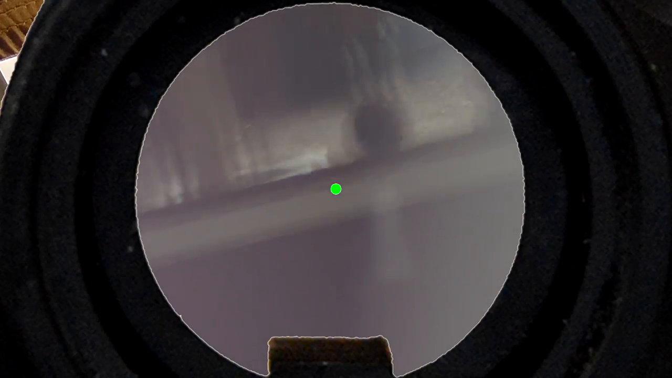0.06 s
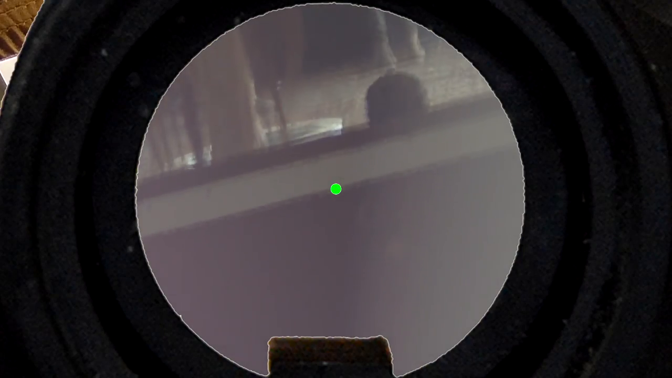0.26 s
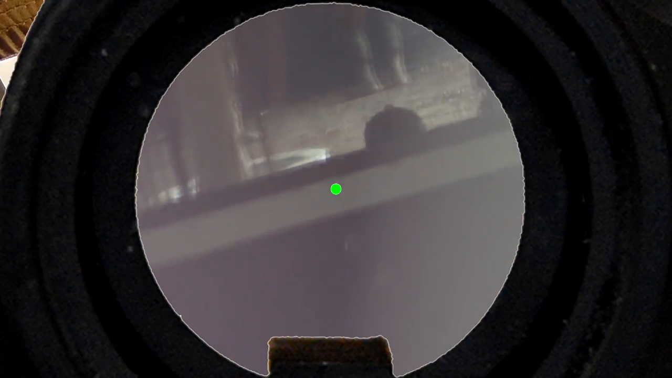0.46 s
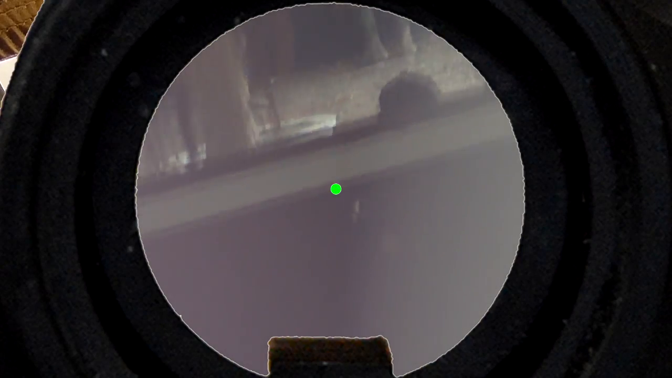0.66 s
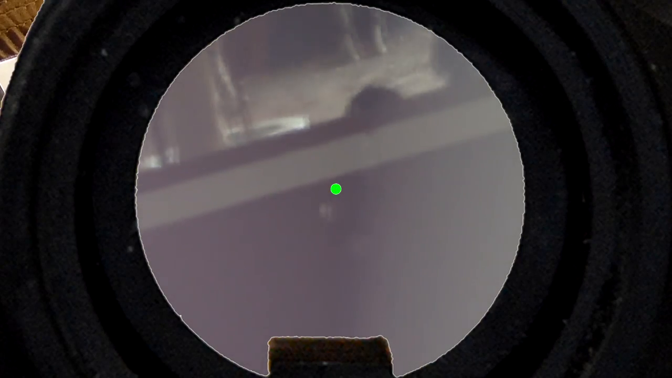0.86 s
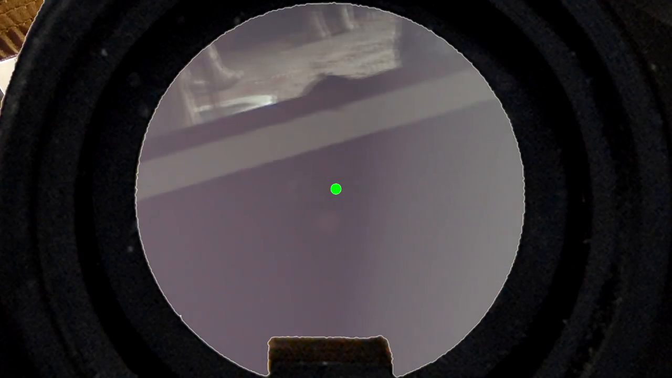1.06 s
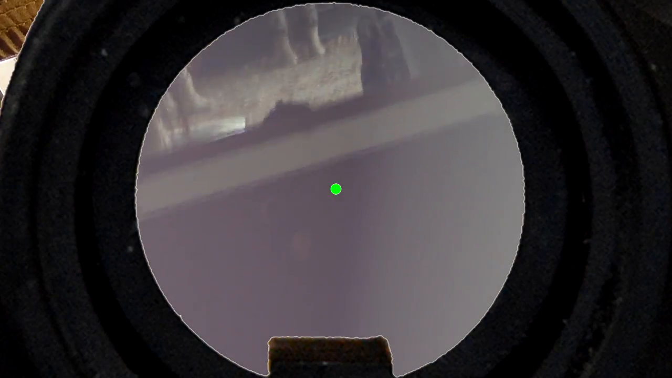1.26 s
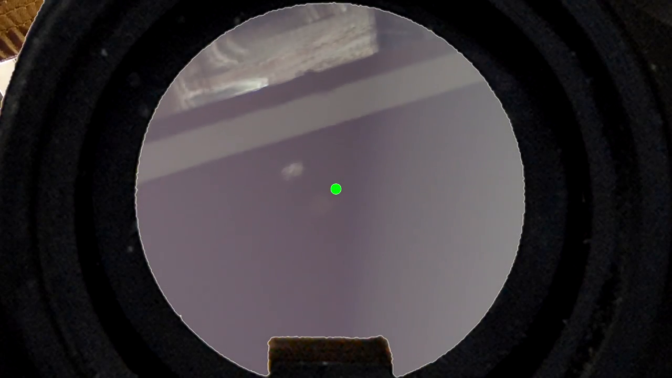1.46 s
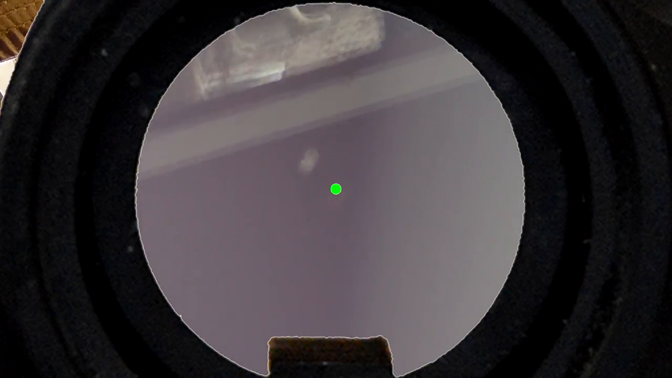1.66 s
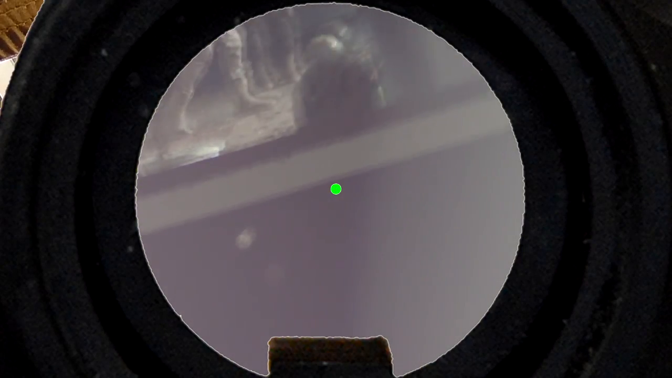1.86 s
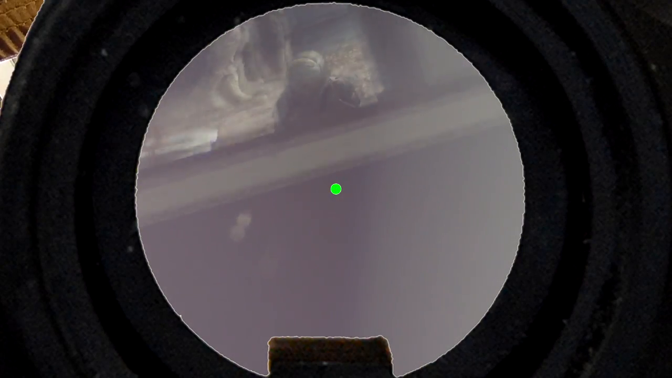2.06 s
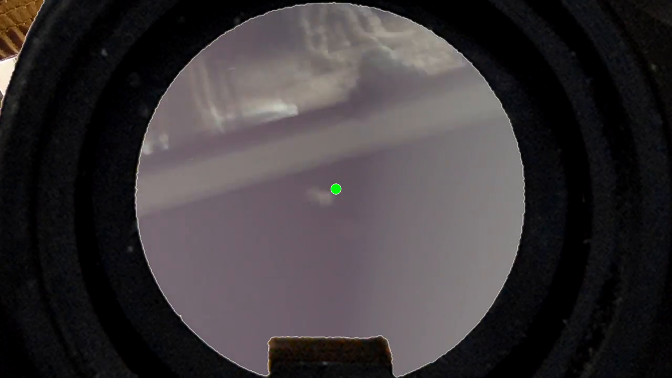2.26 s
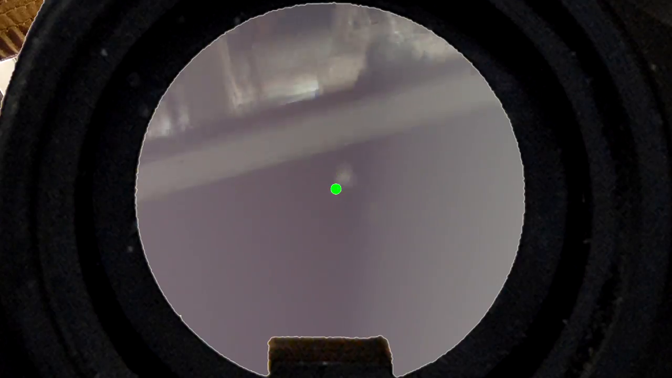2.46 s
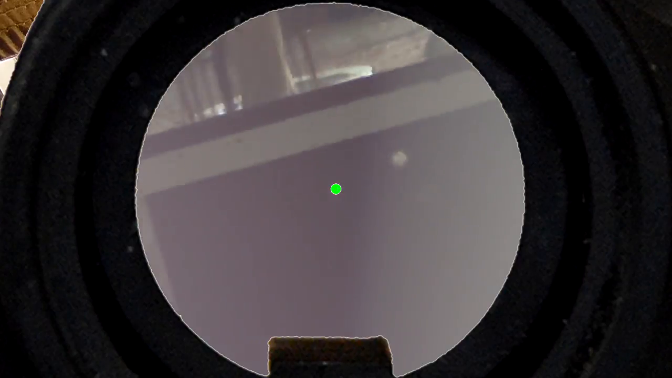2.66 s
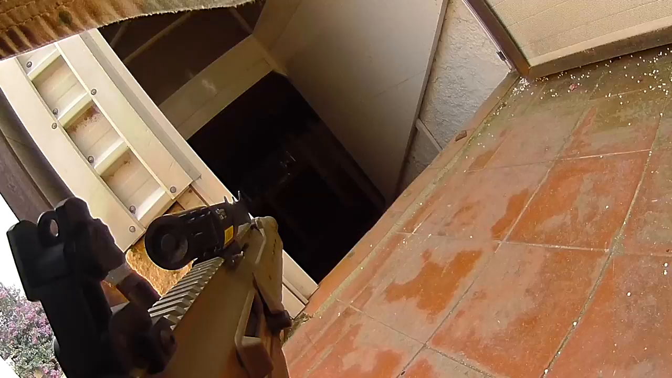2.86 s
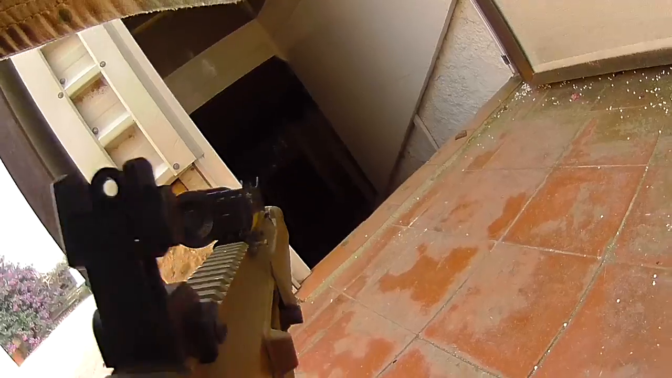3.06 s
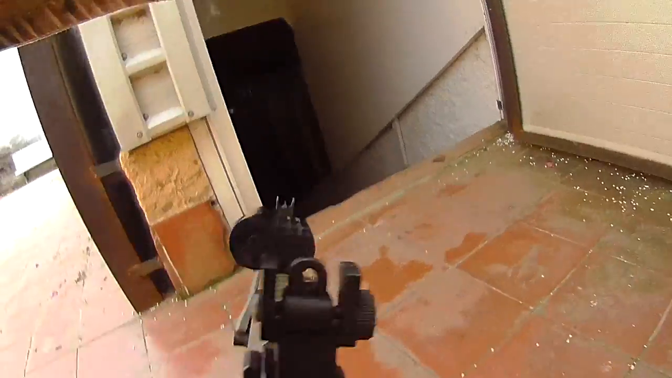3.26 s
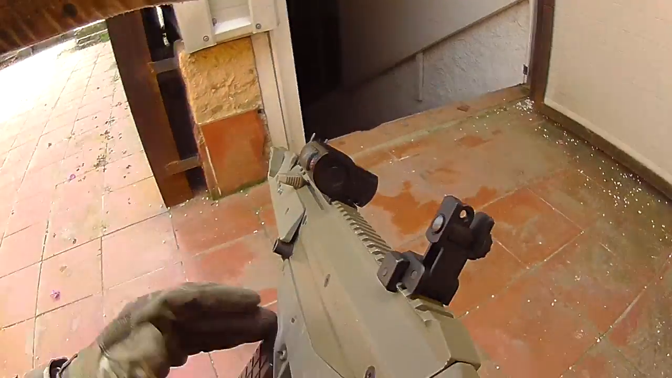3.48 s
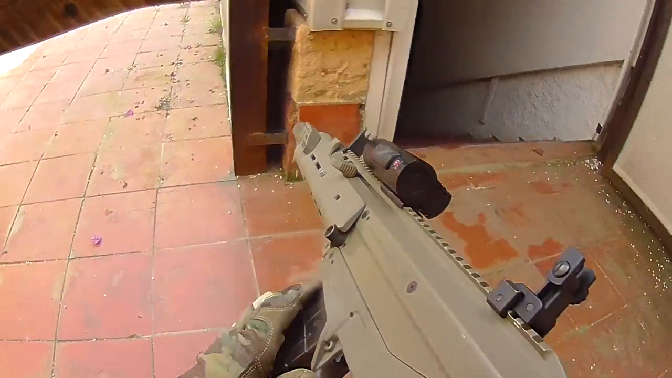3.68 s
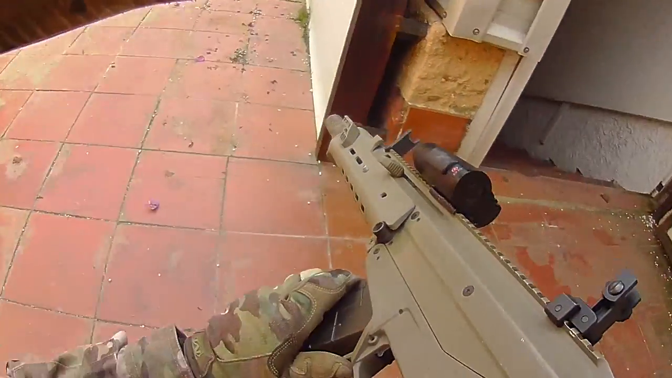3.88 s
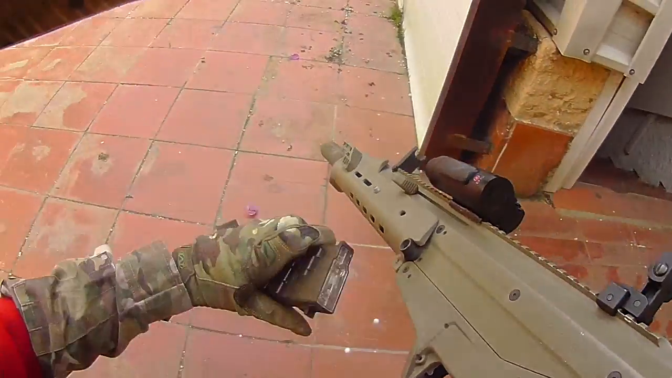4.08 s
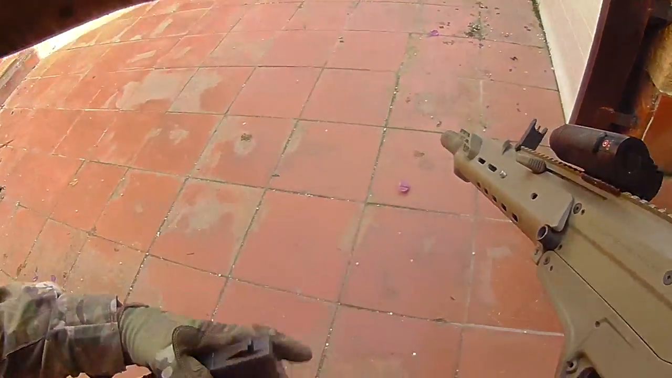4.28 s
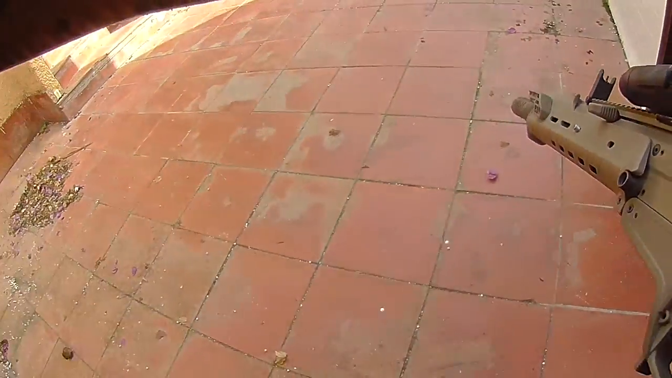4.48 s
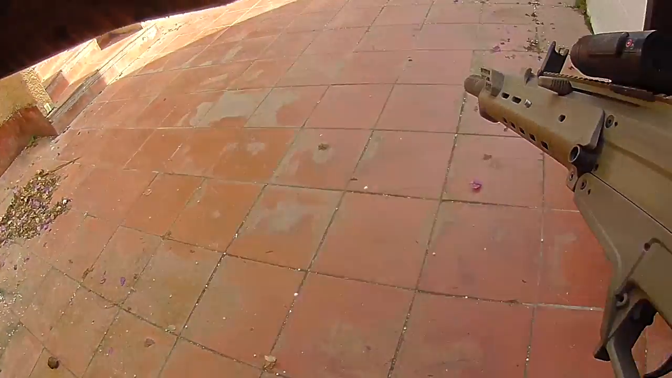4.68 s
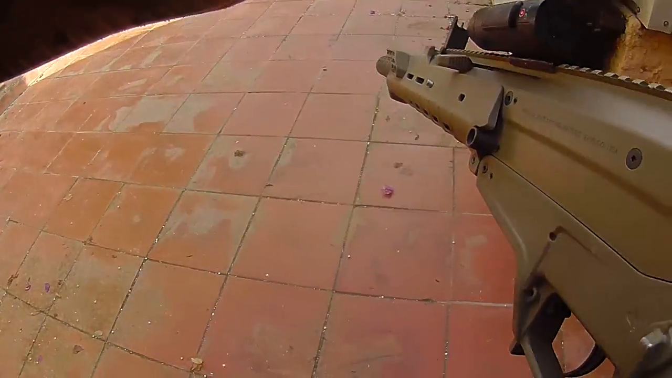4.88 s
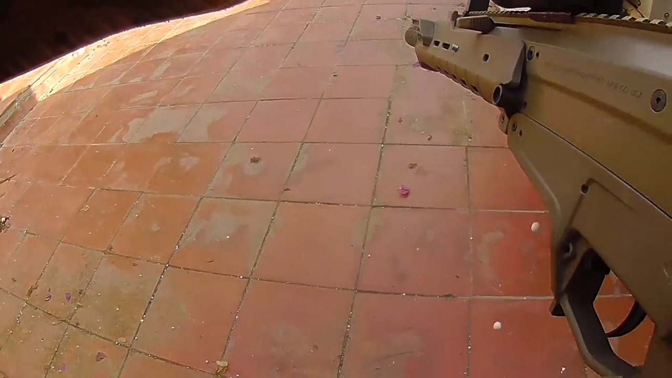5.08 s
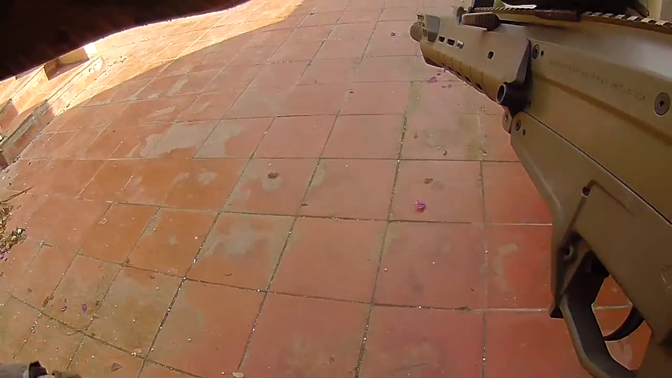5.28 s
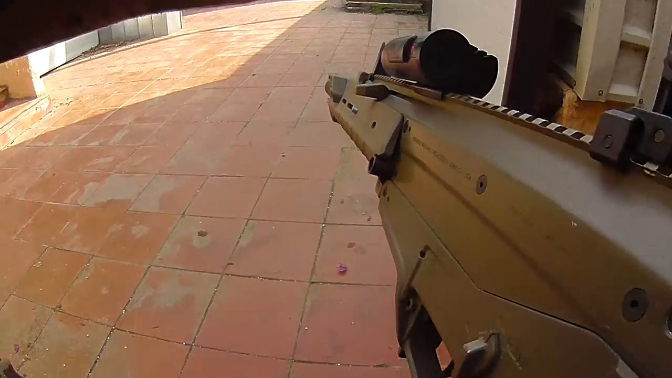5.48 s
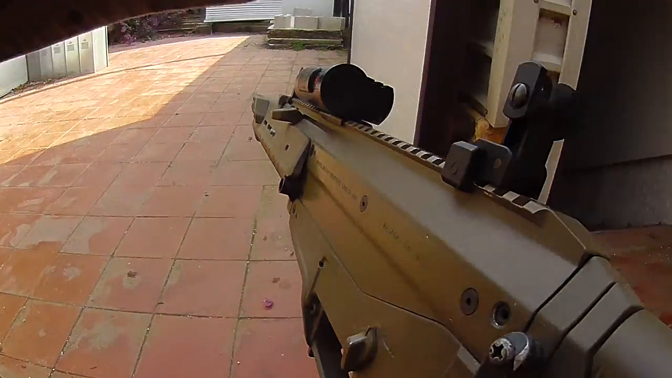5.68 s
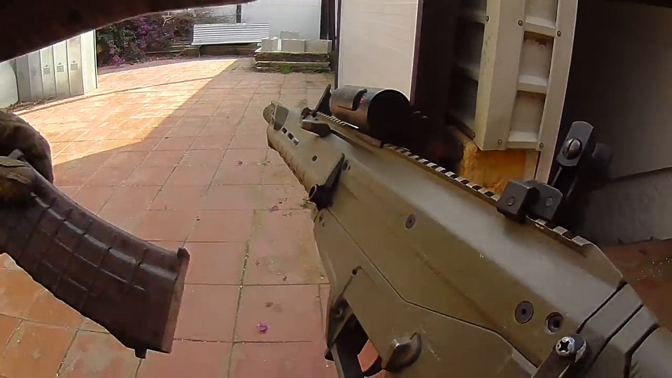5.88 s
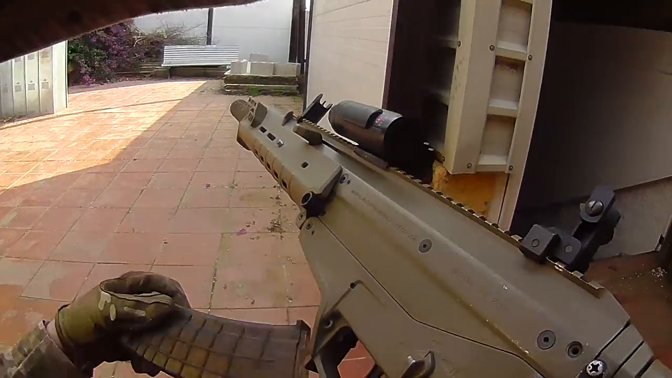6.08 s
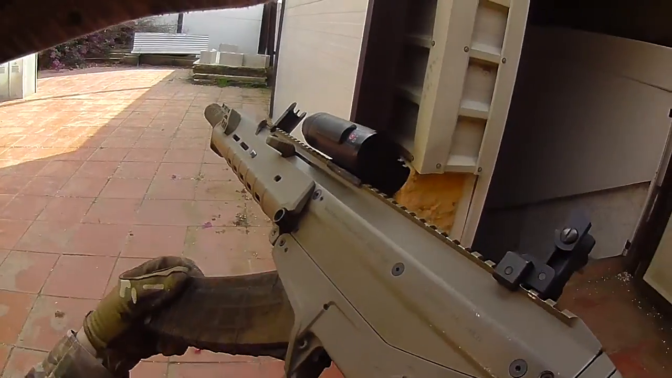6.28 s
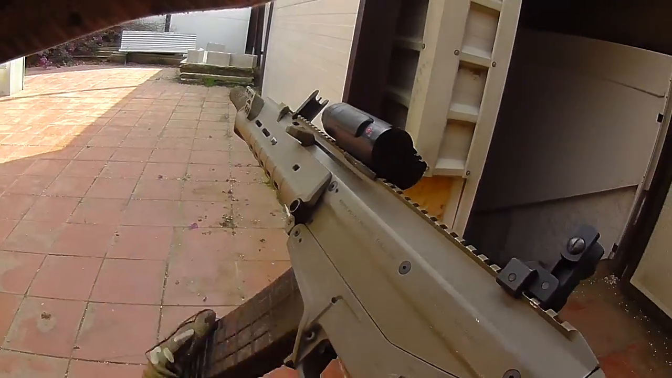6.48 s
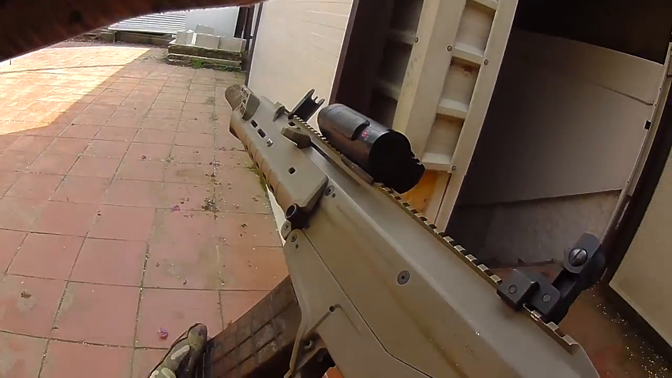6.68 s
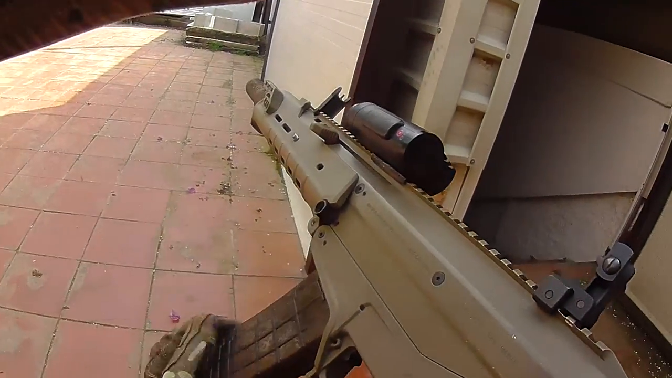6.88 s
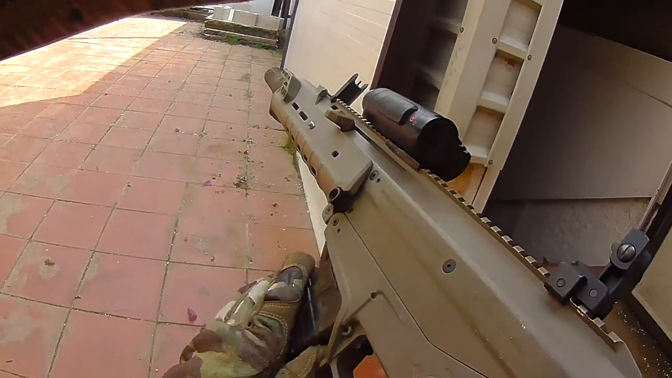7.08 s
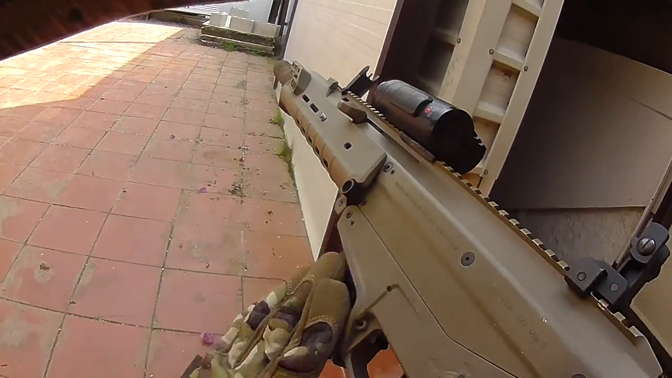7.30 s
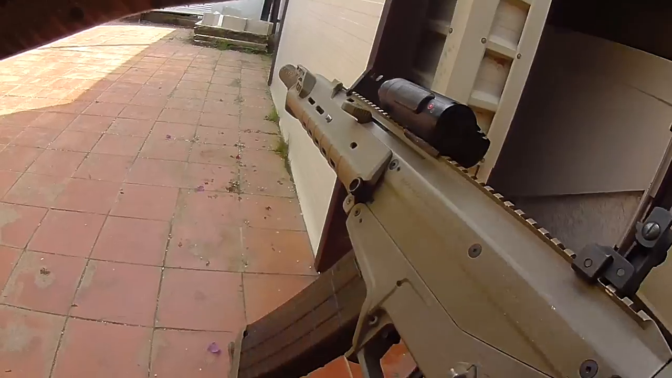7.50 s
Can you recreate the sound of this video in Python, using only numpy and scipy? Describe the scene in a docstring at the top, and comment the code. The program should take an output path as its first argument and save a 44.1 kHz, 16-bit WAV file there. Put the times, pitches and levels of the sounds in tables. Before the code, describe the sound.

Six dry mechanical airsoft shots in two groups, geared motor whirring before each slam, pellets drumming a panel some metres away. Between the groups come echoing far snaps, a metallic ping and low bumps. Then quieter handling: rustling sleeves, a sharp plastic catch, fiddly pouch clicks, a brief squeak, a cluster of magazine knocks and a harsh slide. Close microphone, tiled porch with faint wall echo.

```python
"""Airsoft rifle and magazine change

An electric airsoft rifle fires six single shots from a doorway, close to a small body-worn camera.
Each time meshing gears wind up, the piston slams as struck modes and noise bursts, the motor coasts and
the pellet raps a panel some metres off. Sharp snaps and a metal ping come from across the yard; then the
magazine is changed as filtered knocks, clicks, scrapes and a squeak, amid cloth noise of rustling kit."""
import sys
import numpy as np
from scipy import signal
from scipy.fft import rfft, irfft, next_fast_len
from scipy.io import wavfile
from scipy.ndimage import uniform_filter1d

SR = 44100
rng = np.random.default_rng(int(sys.argv[2]) if len(sys.argv) > 2 else 0)


def unload_audio(sound):
    """Save the sound as a 16-bit wav file, at the path given as the first command line argument."""
    columns = np.transpose(np.atleast_2d(sound))
    # keep every value between -1 and 1, then stretch to whole-number steps
    steps = np.round(np.clip(columns, -1, 1) * 32767)
    wavfile.write(sys.argv[1], SR, steps.astype(np.int16))


N = 332479
TIME = np.arange(N) / SR
AGE = TIME[:SR // 2]  # time since the onset of one hit, s

# Bright outline of muzzle spit and of the thin snap of hard contacts. Each row: frequency in Hz, level in dB.
SPIT_COLOUR = [(5000, -46), (8500, -3.5), (11000, -0.5), (13000, 0.5), (15500, -0.5)]
# Outline of a hard edge being touched. Each row: frequency in Hz, level in dB.
EDGE_COLOUR = [(1500, -30), (2800, 11.5), (5000, 15.5), (6800, 11), (8200, -4), (15000, -27)]
# Resonances of the plastic shell. Each row: centre in Hz, width in Hz, lift in dB.
SHELL_RESONANCES = [(750, 180, 4), (1117, 14, 6), (1465, 87, 3.5), (1850, 56, 2.5), (2500, 290, 2),
                    (4530, 430, 2.5), (6200, 390, 6.5)]
# Resonances of the small clicking parts. Each row: centre in Hz, width in Hz, lift in dB.
CLICK_RESONANCES = [(1097, 53, 9), (1724, 160, 5), (2440, 230, 11), (4470, 220, 4), (5470, 700, 8),
                    (6670, 760, 9)]


def undb(db):
    """Decibels to gain."""
    return 10 ** (np.asarray(db) / 20)


def unit(x):
    """Scale to rms 1."""
    return x / np.sqrt(np.mean(x ** 2))


def blow(x, db):
    """Scale a hit so that its energy equals 10 ms at this rms level."""
    return x * undb(db) / np.sqrt(np.sum(x ** 2) / (SR / 100))


def add(track, s, x):
    """Mix x into the track at time s."""
    i = max(int(s * SR), 0)
    track[i:i + len(x)] += x[:max(N - i, 0)]


def colour(x, points, peaks=()):
    """Causal filter from a (Hz, dB) outline with resonances (Hz, width Hz, dB) on top."""
    size = 2 * next_fast_len(len(x) // 2 + 2048)
    f = np.arange(size // 2 + 1) * SR / size + 1
    hz, db = np.transpose(points)
    db = np.interp(np.log(f), np.log(hz), db)
    for centre, width, lift in peaks:
        db = db + 10 * np.log10(1 + (undb(lift) ** 2 - 1) / (1 + (2 * (f - centre) / width) ** 2))
    # folding the cepstrum gives minimum phase, so nothing sounds before the hit
    cepstrum = irfft(db * np.log(10) / 20)[:size // 2]
    cepstrum[0] /= 2
    return irfft(rfft(x, size) * np.exp(rfft(2 * cepstrum, size)))[:len(x)]


def low_cut(x, hz):
    """Small bodies radiate little below their lowest resonance."""
    return signal.sosfilt(signal.butter(2, hz, "high", fs=SR, output="sos"), x)


def disperse(x, lag_s):
    """Bending waves in a shell: treble arrives first; lag_s is the delay at 1 kHz."""
    size = 2 * next_fast_len(len(x))
    f = np.arange(size // 2 + 1) * SR / size
    delay = np.exp(-4j * np.pi * lag_s * np.sqrt(1000 * f))
    return irfft(rfft(x, size) * delay, size)[:len(x)]


def fade(t60):
    """Exponential decay by 60 dB in t60 seconds."""
    return np.exp(-np.log(1000) * AGE / t60)


def burst(t60, rise=0):
    """Decaying noise with an optional soft start; both times in s."""
    return rng.standard_normal(len(AGE)) * fade(t60) * (1 - np.exp(-AGE / (rise + 1e-6)))


def ring(modes):
    """Struck modes (Hz, dB, t60 s) as decaying sines."""
    return sum(undb(db) * fade(t60) * np.sin(2 * np.pi * hz * AGE) for hz, db, t60 in modes)


def contact(t60, chatter_db=2):
    """A hard first touch followed by the chatter of loose parts."""
    chatter = blow(burst(t60), 0) / np.sqrt(SR / 100)  # same energy as the one-sample touch
    return (AGE == 0) + undb(chatter_db) * chatter


def walk(rate):
    """Slow random drift with a spread near 1, through this many new values per second."""
    knots = np.arange(0, N / SR + 1, 1 / rate)
    return np.interp(TIME, knots, rng.standard_normal(len(knots)))


def rumble():
    """Low outdoor rumble: dark noise that follows a level curve."""
    # Course of the rumble. Each row: time in seconds, level in dB.
    course = [(0, -58), (1.2, -61.5), (2.05, -49.5), (3.05, -77.5), (7.5, -78.5)]
    # Its outline. Each row: frequency in Hz, level in dB.
    rumble_colour = [(25, -2), (60, -2), (100, 10), (140, -2), (250, -2), (500, -32)]
    level_db = np.interp(TIME, *np.transpose(course))
    return unit(colour(rng.standard_normal(N), rumble_colour)) * undb(level_db)


def stirring():
    """Rubbing and swish levels: every movement or slide swells to its fastest moment and settles again."""
    # Cloth movements of arms and body, with short scrapes and slides of the magazine among them.
    # Each row: fastest moment in seconds, swell in seconds, settling in seconds, rubbing level in dB,
    # swish level in dB.
    moves = [(1.85, 0.63, 1.4, -45.5, -44), (3.216, 0.012, 0.5, -66, -50), (3.52, 0.55, 0.33, -49, -44),
             (3.895, 0.23, 0.26, -42.5, -38.5), (4.04, 0.062, 0.11, -55, -34),
             (4.45, 0.31, 0.19, -49.5, -45.5), (4.82, 0.42, 0.62, -49.5, -49.5), (5.3, 1, 1.8, -41, -43.5),
             (5.7, 0.4, 0.45, -46.5, -35), (6.2, 1, 0.29, -43.5, -57), (6.59, 0.044, 0.023, -25, -23.5),
             (6.6, 0.21, 0.34, -39.5, -33), (6.645, 0.15, 0.05, -45, -28.5), (7.29, 0.57, 0.23, -40.5, -36),
             (7.5, 0.5, 0.19, -38.5, -32.5)]
    range_db = 22  # a movement changes by this much over its swell or settling time
    power = undb([[-58], [-64.5]]) ** 2  # rub and swish in dB: the kit never comes quite to rest
    for s, swell_s, settle_s, rub_db, swish_db in moves:
        away = np.maximum((s - TIME) / swell_s, (TIME - s) / settle_s)
        power = power + (undb([[rub_db], [swish_db]]) * undb(-range_db * away)) ** 2
    return np.sqrt(power)


def kit(grain_db=1.5, flutter_db=1.8, tick_db=-1, ticks_per_s=30):
    """Cloth and sliding magazine rub and swish in uneven small catches; buckles and loose pellets tick."""
    # Outline of dull rubbing. Each row: frequency in Hz, level in dB.
    rub_colour = [(120, -37), (300, -13), (500, -1), (820, 1.5), (1500, 1.5), (2200, -2.5), (4000, -25)]
    # Outline of bright swishing. Each row: frequency in Hz, level in dB.
    swish_colour = [(1200, -23), (2700, 1), (4500, 0), (6200, 4.5), (7000, -6), (8200, -23), (15000, -42)]
    catches = undb(grain_db * walk(500) + flutter_db * walk(41))
    taps = (rng.random(N) < ticks_per_s / SR) * rng.uniform(-0.79, 1, N)
    ticks = signal.fftconvolve(taps, blow(contact(0.048, chatter_db=3), tick_db))[:N]
    rubbing, swishing = stirring()
    rub = unit(colour(catches * rng.standard_normal(N) + 2 * ticks, rub_colour)) * rubbing
    swish = unit(colour(catches * rng.standard_normal(N) + .5 * ticks, swish_colour)) * swishing
    return rub + swish


def motor(wind_s):
    """Mesh rate and gear level: speed levels off against the spring, then friction brakes the freed gears."""
    start_hz, full_hz = 350.4, 1699  # tooth mesh rate at the first turn and at full speed
    spin_up_s, spin_up_power = .031, 1.6  # time and steepness of the spin-up
    engage_s, coast_s = 0.0033, .1  # the gears take up load; later friction stops them
    unloaded_db, coast_db_per_s = -3, 67.5  # they run quieter once the piston is free, and fade
    driven_hz = full_hz - (full_hz - start_hz) * np.exp(-(AGE / spin_up_s) ** spin_up_power)
    hz = driven_hz * np.clip(1 - (np.maximum(AGE - wind_s, 0) / coast_s) ** 2, 0, 1)
    coasting = undb(unloaded_db - coast_db_per_s * (AGE - wind_s))
    load = (1 - np.exp(-AGE / engage_s)) * np.where(AGE < wind_s, 1, coasting)
    return hz, load * hz / full_hz  # gear noise grows in proportion to speed


def gears(wind_s, whine_db=-0.5, coast_db=-7):
    """The motor spins up against the spring and coasts down; meshing teeth whine and rattle the gearbox."""
    # Gearbox and receiver resonances. Each row: centre in Hz, width in Hz, lift in dB.
    gearbox = [(580, 140, 4.5), (915, 61, 5.5), (1180, 42, 8.5), (1457, 54, 14), (1664, 60, 5),
               (3406, 150, 11), (6260, 140, 14), (6520, 190, 5)]
    # Outline of the gear noise. Each row: frequency in Hz, level in dB.
    clatter_colour = [(40, -25), (190, -14.5), (330, 0), (480, 1.5), (900, 3), (1600, -5), (2000, -5.5),
                      (5000, -5), (6800, -8), (8200, -25), (15000, -32.5)]
    # Gear tones, which swell as they sweep through the gearbox resonances.
    # Each row: multiple of the mesh rate, level in dB.
    gear_tones = [(.35, -5), (1, 0), (1.999, -2), (4.001, -1.5)]
    rough, scatter_db, tooth_share = .025, 3.0, .3  # speed wobble, force spread, strike decay in teeth
    hz, effort = motor(wind_s)
    wobble = unit(uniform_filter1d(rng.standard_normal(len(AGE)), size=60))
    teeth = np.cumsum(hz * (1 + rough * wobble)) / SR  # teeth passed so far
    force = undb(scatter_db * rng.standard_normal(len(AGE)))[teeth.astype(int)]  # one force per tooth

    strikes = np.exp(-(teeth % 1) / tooth_share)
    strikes = strikes + np.exp(-(teeth * gear_tones[0][0] % 1) / (tooth_share / 2))  # the slower gear
    # loose rattle rings the box less than the steady mesh
    damped = [(centre, width, db / 2) for centre, width, db in gearbox]
    clatter = colour(force * strikes * rng.standard_normal(len(AGE)) * effort, clatter_colour, damped)

    load = np.where(AGE < wind_s, 1, undb(coast_db))  # unloaded teeth sing less
    tones = sum(undb(db) * np.sin(2 * np.pi * multiple * teeth) for multiple, db in gear_tones)
    whine = colour(force * tones * effort * load, clatter_colour, gearbox)
    mix = (unit(clatter) + undb(whine_db) * unit(whine)) / np.hypot(1, undb(whine_db))
    return mix * np.sqrt(np.mean(effort ** 2))


def rifle(thump_hz=440, bounce_s=.0062, bounce_db=-3, recoil_s=0.022, recoil_db=-15,
          stock_db=-33, start_db=-31):
    """Wind-up, then the piston slams home with a puff of air, bounces once, and the spring settles."""
    # The shots. Each row: piston slam in seconds, wind-up time in seconds, gear level in dB,
    # piston thump in dB, air crack in dB, muzzle spit in dB.
    shots = [(0.1134, 0.075, -16, -16, -12.5, -51.5), (0.433, 0.074, -17, -13.5, -12, -43),
             (.858, 0.075, -16, -14, -14, -34), (2.188, 0.081, -15, -13, -14, -47),
             (2.527, 0.072, -17.5, -12.5, -10, -23.5), (2.8102, 0.064, -20.5, -14.5, -11, -23.5)]
    # Outline of the air crack. Each row: frequency in Hz, level in dB.
    crack_colour = [(50, -32), (280, 1.5), (700, 3.5), (1600, -1.5), (2200, -4), (6500, -10), (8200, -20.5),
                    (15000, -33)]
    thump = ring([(thump_hz, 0, .016), (720, -4, .012), (270, -12, .025)])
    thump = low_cut(thump * (1 - fade(0.015)), 230)
    stock = low_cut(ring([(99.5, 6.5, 0.15), (880, -16, 1.0)]) * (1 - fade(0.0062)), 54)
    out = np.zeros(N)
    for s, wind_s, gear_db, thump_db, crack_db, spit_db in shots:
        add(out, s - wind_s, undb(gear_db) * gears(wind_s))
        add(out, s - wind_s + 0.0066, blow(thump, start_db))  # the motor jolts as it starts
        add(out, s - .012, blow(stock, stock_db))  # the released spring kicks the stock and rings on
        add(out, s, blow(thump, thump_db))
        add(out, s + recoil_s, blow(thump, thump_db + recoil_db))
        for lag_s, db in ((0, -2), (bounce_s, bounce_db)):
            add(out, s + lag_s, blow(colour(burst(0.03), crack_colour), crack_db + db))
            add(out, s + lag_s, blow(colour(burst(0.029), SPIT_COLOUR), spit_db + db))
    return out


def pellets(second_s=0.0053, tail_db=-14):
    """Each pellet drums the panel's modes, and the panel rattles against its frame in two noise bursts."""
    # Pellets hitting the panel. Each row: time in seconds, drum level in dB, rattle level in dB.
    hits = [(0.214, -20.5, -21), (0.5316, -19, -20.5), (0.9554, -20, -21), (2.2831, -20.5, -22.5),
            (2.6217, -28.5, -34.5), (2.917, -68.5, -31)]
    # Panel modes. Each row: frequency in Hz, level in dB, t60 in seconds.
    panel_modes = [(331.6, 17, 0.053), (408, 11.5, 0.041)]
    # Outline of the rattle. Each row: frequency in Hz, level in dB.
    panel_colour = [(100, -36.5), (300, -1), (700, 4), (1450, 1.5), (2000, -6.5), (2800, -3), (4000, -10),
                    (5700, -4), (6800, -9.5), (8200, -27), (15000, -34)]
    drum = low_cut(ring(panel_modes) * (1 - fade(0.013)), 240)
    out = np.zeros(N)
    for s, drum_db, rattle_db in hits:
        add(out, s, blow(drum, drum_db))
        add(out, s, blow(colour(burst(0.051, rise=0.0014), panel_colour), rattle_db - 2.0))
        rattle = burst(0.065) + undb(tail_db) * burst(0.15)
        add(out, s + second_s, blow(colour(rattle, panel_colour), rattle_db))
    return out


def bumps():
    """Dull nudges that reach the camera through its mount: two low modes with a soft start."""
    # Soft bumps against the camera. Each row: time in seconds, level in dB.
    nudges = [(1.208, -44), (1.42, -46), (1.874, -39.5), (1.942, -39), (1.965, -27.5)]
    nudge = ring([(115, -2.5, 0.031), (235, -4, 0.0193)]) * (1 - fade(0.0095))
    out = np.zeros(N)
    for s, db in nudges:
        add(out, s, blow(nudge, db))
    return out


def yard(ping_s=1.996):
    """Distant snaps with the echo of the walls, and one pellet ringing on metal."""
    # Snaps from across the yard. Each row: time in seconds, level in dB, echo level in dB.
    snaps = [(1.4226, -30, -31.5), (1.584, -26.5, -29), (1.729, -27, -24)]
    # Their outline. Each row: frequency in Hz, level in dB.
    snap_colour = [(200, -8.5), (700, -9), (1400, -5), (2600, -11), (3500, -4), (4400, -4.5), (5100, -1),
                   (5900, -2), (6700, -1), (8200, -20.5), (15000, -29.5)]
    # Narrow resonances of each snap. Each row: centre in Hz, width in Hz, lift in dB.
    snap_ring = [(3620, 300, 18), (5180, 170, 12.5), (6700, 300, 12)]
    # Modes of the struck metal. Each row: frequency in Hz, level in dB, t60 in seconds.
    ping_modes = [(880, 0.5, 0.82), (1630, 2.5, .3), (3700, -12, .28), (4226, 3, .45), (5103, -6, .22),
                  (6550, 9.5, 0.29)]
    out = np.zeros(N)
    for s, db, echo_db in snaps:
        add(out, s - .005, blow(colour(burst(0.014), snap_colour), db - 9.5))  # a weaker snap just ahead
        add(out, s, blow(colour(burst(0.027), snap_colour, snap_ring), db))
        add(out, s, blow(colour(burst(0.52, rise=0.0032), snap_colour), echo_db))
    flutter = undb(2 * walk(110)[:len(AGE)])
    add(out, ping_s, blow(ring(ping_modes) * flutter, -19.5))
    add(out, ping_s, blow(colour(burst(0.47), snap_colour), -17.5))
    return out


def magazine(low_db=-13, shoulder_db=-2, high_db=-16):
    """Plastic knocks: the shell's body tone, a hard edge and a thin snap; the catch rings as it lets go."""
    # Clicks and knocks of rifle body, magazine and catch. Each row: time in seconds, body level in dB,
    # edge level in dB, t60 in seconds, extra resonance of the spot in Hz.
    knocks = [(2.1268, -10, -37, 0.23, 755), (2.139, -13, -19.5, 0.13, 1140),
              (3.335, -38, -44, 0.025, 1900), (3.3875, -34, -50, 0.022, 1100),
              (3.416, -36.5, -44, 0.037, 1640), (3.8735, -36, -35.5, 0.027, 2200),
              (3.912, -30, -40, 0.048, 1100), (3.918, -33.5, -26.5, 0.013, 1600),
              (4.0108, -28, -24, 0.065, 1550), (4.0128, -26, -19.3, 0.02, 2150),
              (4.065, -35, -41.5, 0.03, 1400), (4.703, -35.5, -41, 0.066, 840),
              (5.2856, -23.5, -41, 0.065, 1640), (5.6738, -38, -20, 0.073, 1500),
              (5.8925, -33.5, -31.5, 0.041, 890), (6.2068, -37, -31.5, 0.12, 2910),
              (6.2256, -24.5, -20, 0.028, 2820), (6.281, -31.5, -33, 0.043, 1200),
              (6.3055, -23, -20.5, 0.033, 2480), (6.3171, -22, -29, 0.068, 1100),
              (6.349, -20.5, -25, 0.041, 1900), (6.3574, -20.5, -27.5, 0.049, 718),
              (6.497, -36, -44, 0.038, 1400), (6.5195, -23, -37, 0.045, 1100),
              (6.526, -23, -30, 0.036, 1850), (6.535, -17, -21.5, 0.043, 707), (7.512, -20, -50, 0.08, 560),
              (7.523, -18, -30, 0.035, 1390)]
    # Modes of the catch's spring and the hollow magazine. Each row: frequency in Hz, level in dB,
    # t60 in seconds.
    release_modes = [(765, -34, .85), (3560, -18, .27), (4980, 0, .037), (6420, -23, .2)]
    out = np.zeros(N)
    for s, body_db, edge_db, t60, ring_hz in knocks:
        # bigger parts ring longer and lower: 0.26 octaves down per doubling of t60
        hz = 1440 * (0.038 / t60) ** 0.26
        low_hz = min(hz * hz / 2500, .9 * hz)  # small parts tick in a narrow band, big ones knock broadly
        outline = [(low_hz / 5.5, -46), (low_hz / 2, low_db), (low_hz, -1), (hz, 0),
                   (hz * 1.44, shoulder_db), (hz * 2.3, high_db), (hz * 7, -50)]
        touch = contact(t60, chatter_db=2.5)
        spot = (ring_hz, ring_hz / 20, 10.5)  # a sharp lift, Q 20
        body = colour(touch, outline, [*SHELL_RESONANCES, spot])
        edge = colour(touch, EDGE_COLOUR, SHELL_RESONANCES)
        add(out, s, blow(body, body_db) + blow(edge, edge_db))
        # only hard, short contacts snap: it grows steeply with the edge, and falls 130 dB per s of t60
        snap_db = -20.5 + 3.3 * (edge_db + 20) - 130 * t60
        add(out, s, blow(colour(contact(t60 / 2), SPIT_COLOUR), snap_db))
    release = low_cut(ring(release_modes), release_modes[0][0] / 2)
    add(out, 4.0125, blow(release, -22.5))
    return disperse(out, lag_s=0.001185)


def click(hz, t60, under_db=-30, over_db=-14):
    """A small hard part is tapped; it rings most in the resonances near hz."""
    # Band that small parts radiate. Each row: frequency in Hz, level in dB.
    click_band = [(7000, 1), (8500, -24)]
    outline = [(hz / 3.4, under_db), (hz / 1.36, -3), (hz, 0), (hz * 2, over_db), (hz * 4, -45)]
    return colour(colour(contact(t60), outline, CLICK_RESONANCES), click_band)


def pouch(t60=0.013):
    """Fingers work at the pouch: its fittings click, and stiff webbing crackles in many small catches."""
    # Light clicks of the pouch's fittings and the catch. Each row: time in seconds, centre in Hz,
    # body level in dB, edge level in dB, snap level in dB.
    clicks = [(4.51, 1410, -30.5, -30, -48), (4.6056, 1700, -27.5, -32, -59), (4.773, 7070, -33, -44, -74),
              (4.8973, 2290, -21, -26, -30), (4.936, 8000, -41.5, -58, -40), (5.421, 1510, -25, -22, -34),
              (5.447, 1590, -31, -36, -55), (5.4717, 1750, -24.5, -28, -53), (6.587, 4396, -24, -25, -30),
              (6.659, 6000, -31, -38, -64)]
    rummage_start_s, rummage_end_s, catch_count = 4.68, 5.55, 60
    catch_hz, loudest_db, range_db = 1300, -41, 10  # centre of the catches, loudest level, spread
    out = np.zeros(N)
    for s, hz, body_db, edge_db, snap_db in clicks:
        edge = colour(contact(t60), EDGE_COLOUR, CLICK_RESONANCES)
        add(out, s, blow(click(hz, t60), body_db) + blow(edge, edge_db))
        add(out, s, blow(colour(contact(t60 / 2), SPIT_COLOUR), snap_db))
    for when, pitch, softness in rng.random((catch_count, 3)):
        s = rummage_start_s + when * (rummage_end_s - rummage_start_s)
        hz = catch_hz * 2 ** (2 * pitch - 1)  # up to an octave either way
        add(out, s, blow(click(hz, 2 * t60), loudest_db - range_db * softness))
    return disperse(out, lag_s=0.00062)


def stroke(s, attack_s, hold_s, release_s):
    """Attack, hold and release from time s."""
    return np.interp(TIME, s + np.cumsum([0, attack_s, hold_s, release_s]), [0, 1, 1, 0])


def drag(drag_db=-20.5, rough=.025):
    """The magazine scrapes out of its pouch; stick and slip quicken into a squeak that rises, peaks and sags."""
    # Outline of the scrape. Each row: frequency in Hz, level in dB.
    drag_colour = [(250, -42), (600, -7), (2150, -1.5), (2700, -16), (6400, -11), (8200, -35)]
    # The squeak within the drag. Each row: time in seconds, stick-slip rate in Hz, level in dB.
    squeak_course = [(5.787, 1130, -36), (5.819, 1556, -13.5), (5.844, 1425, -35)]
    slips = rng.standard_normal(N) * undb(2.3 * walk(770))
    push = stroke(5.764, attack_s=0.044, hold_s=0.038, release_s=0.016) ** 2
    scrape = undb(drag_db) * push * unit(colour(slips, drag_colour, SHELL_RESONANCES))
    s, hz, db = np.transpose(squeak_course)
    slip_hz = np.interp(TIME, s, hz) * (1 + rough * walk(900))
    phase = 2 * np.pi * np.cumsum(slip_hz) / SR
    grip = np.interp(TIME, s, undb(db), left=0, right=0) * undb(2 * walk(500))
    return scrape + grip * np.sin(phase)


def porch(x, t60=0.26):
    """Diffuse echo of tiles and house walls: a softly rising, decaying noise tail."""
    tail = colour(burst(t60, rise=0.02), [(300, -3.0), (1000, 4.0), (7000, 4.5), (15000, -8.0)])
    return signal.fftconvolve(x, tail / np.sqrt(np.sum(tail ** 2)))[:N]


def scene(shot_wet_db=-21, handling_wet_db=-22, side_db=-28):
    """All sources at the centre, with a little width from the walls."""
    firing = rifle() + pellets() + yard()
    handling = magazine() + pouch() + drag() + kit() + bumps()
    echo = porch(undb(shot_wet_db) * firing + undb(handling_wet_db) * handling)
    mid = firing + handling + rumble() + echo
    side = undb(side_db) * colour(porch(mid, t60=0.021), [(300, -8), (1200, 3.5), (14000, 4)])
    return np.array([mid + side, mid - side])


def record(dry, top_hz=15800):
    """The camera clips peaks beyond full scale, then cuts steeply above top_hz."""
    top_cut = signal.ellip(8, .2, 70, top_hz, fs=SR, output="sos")
    return signal.sosfilt(top_cut, np.clip(dry, -1, 1))


dry = scene()
out = record(dry)
unload_audio(out)
```